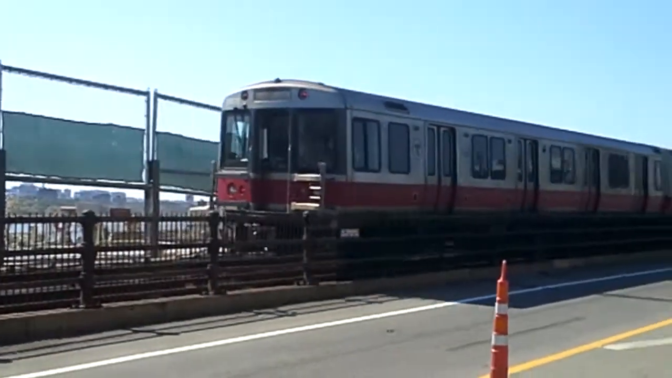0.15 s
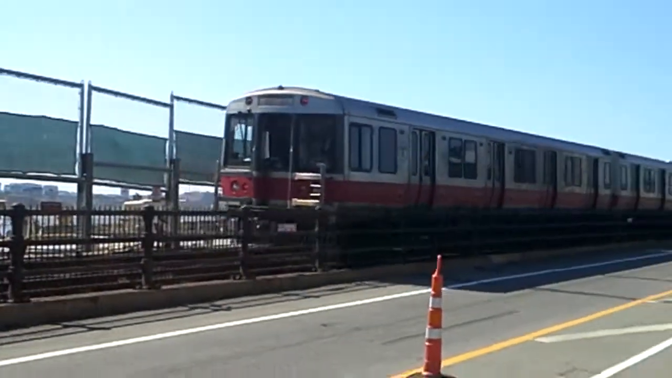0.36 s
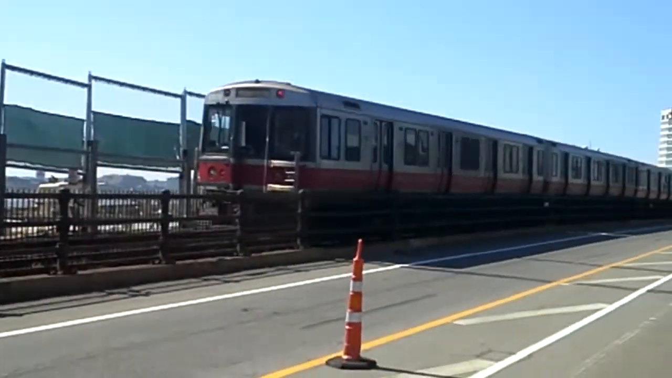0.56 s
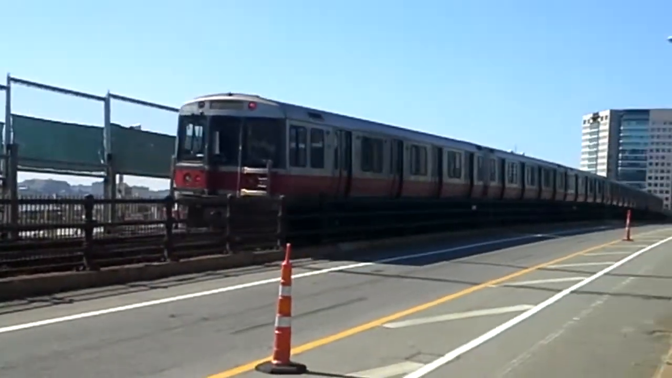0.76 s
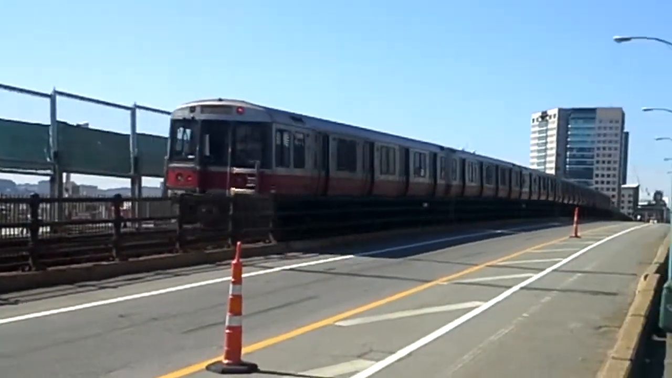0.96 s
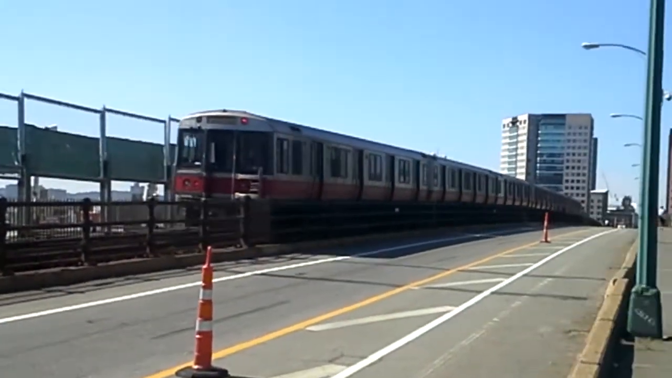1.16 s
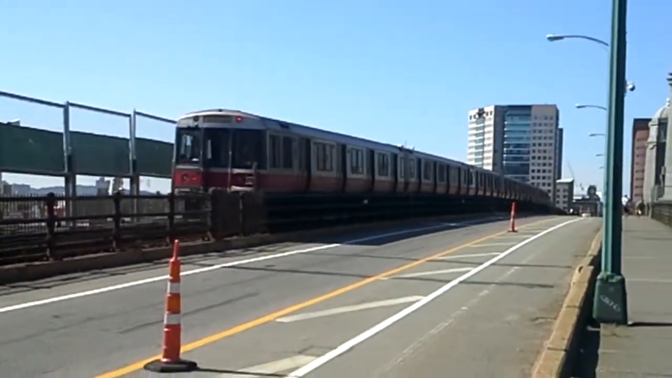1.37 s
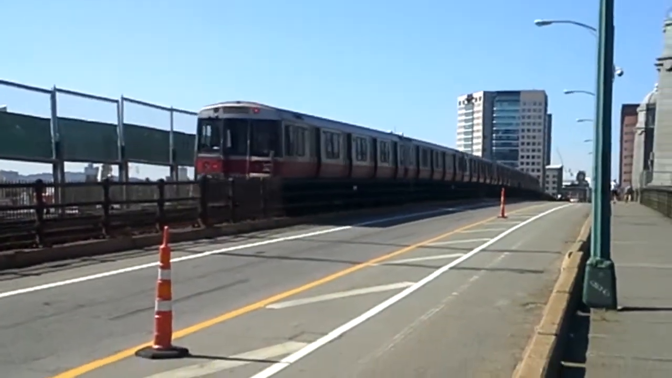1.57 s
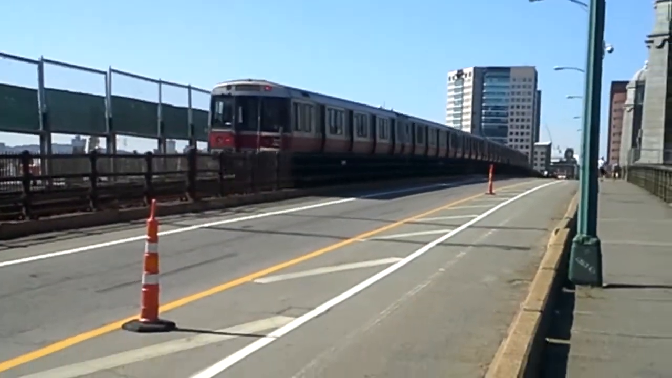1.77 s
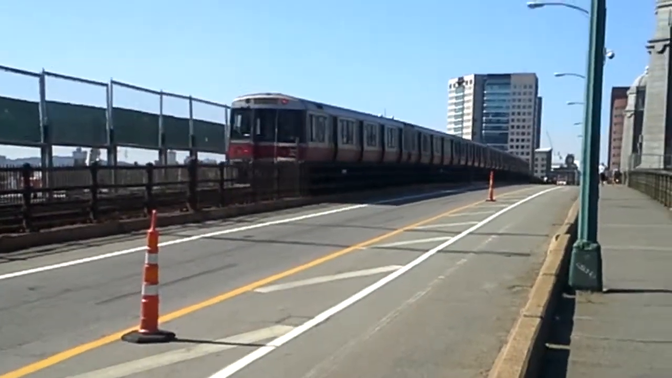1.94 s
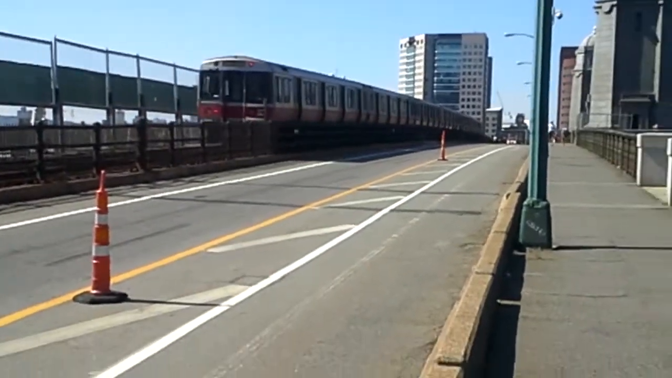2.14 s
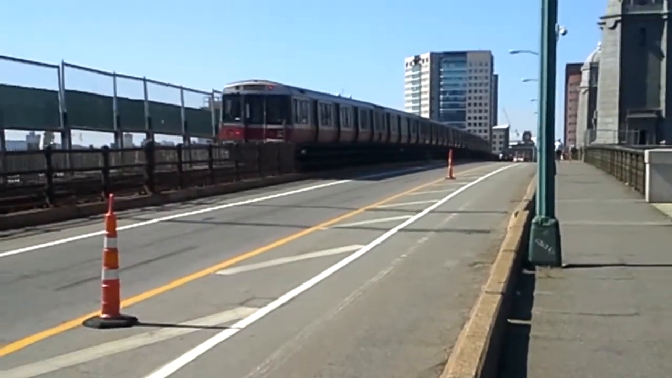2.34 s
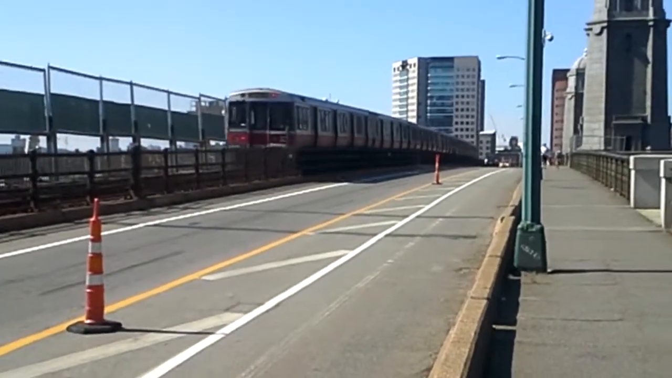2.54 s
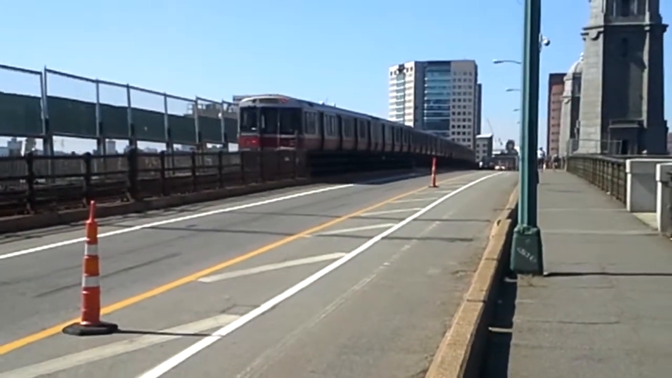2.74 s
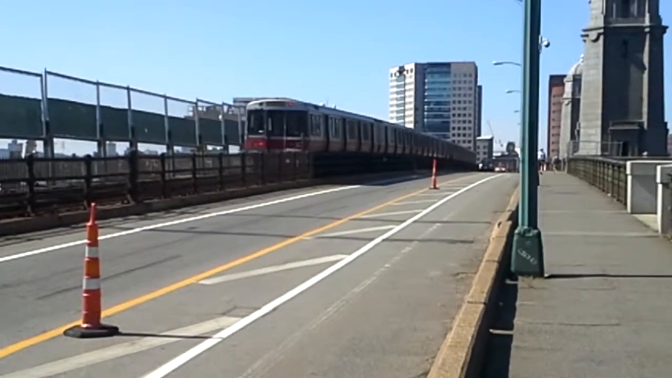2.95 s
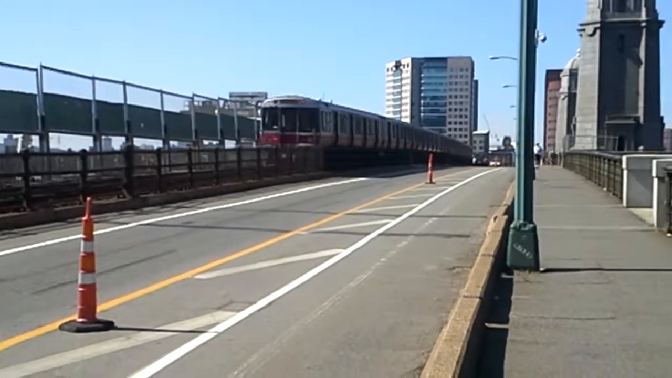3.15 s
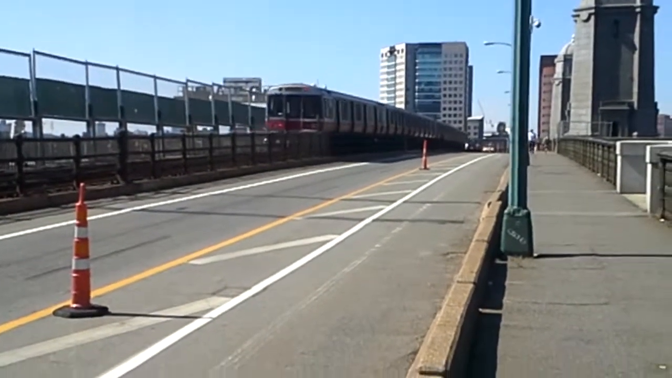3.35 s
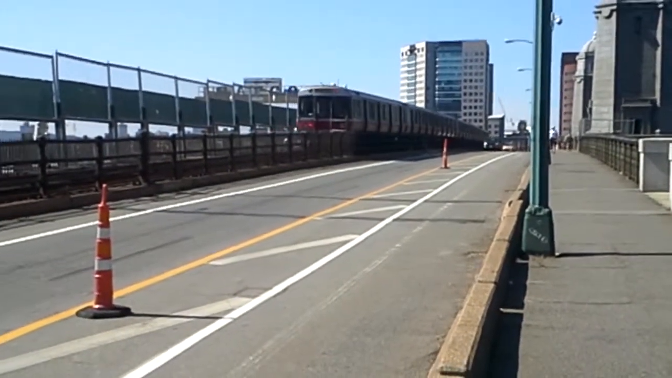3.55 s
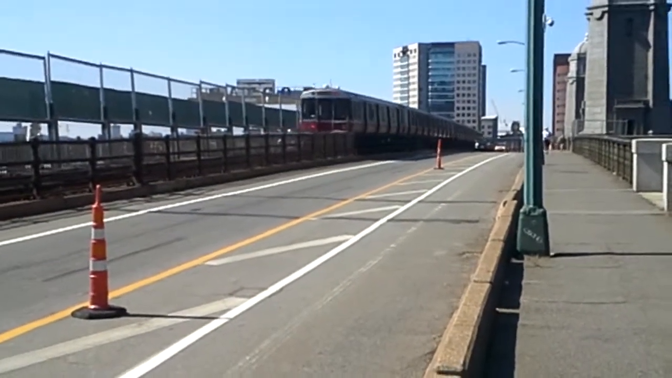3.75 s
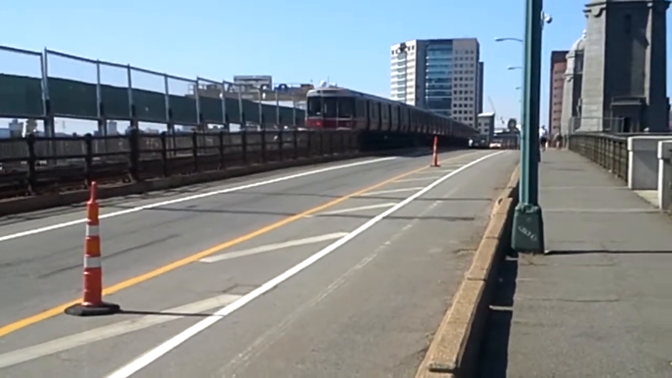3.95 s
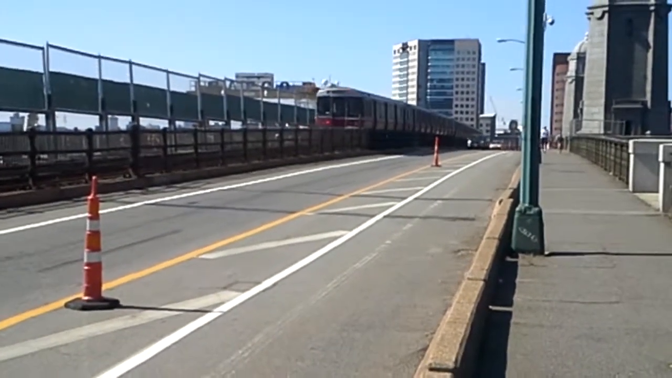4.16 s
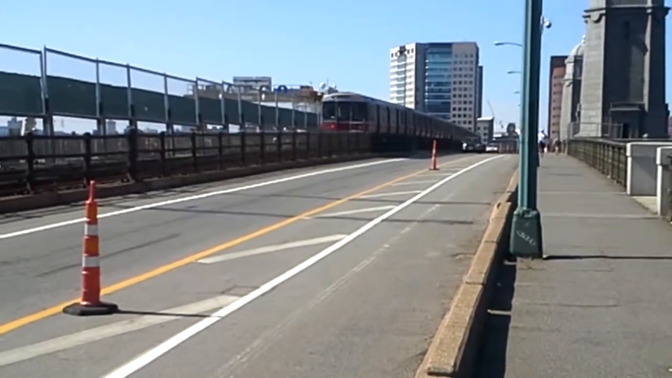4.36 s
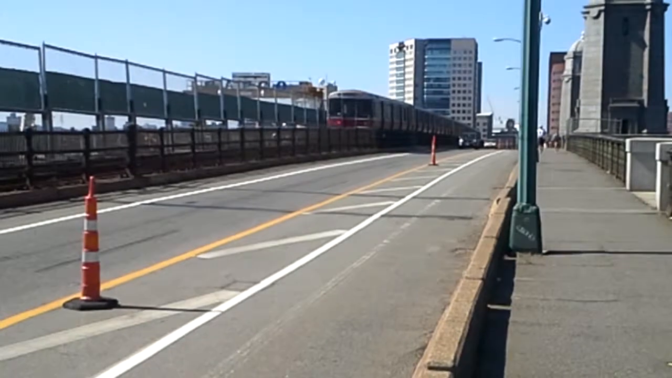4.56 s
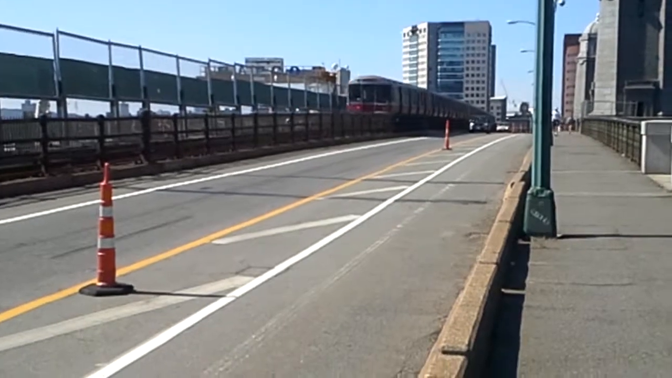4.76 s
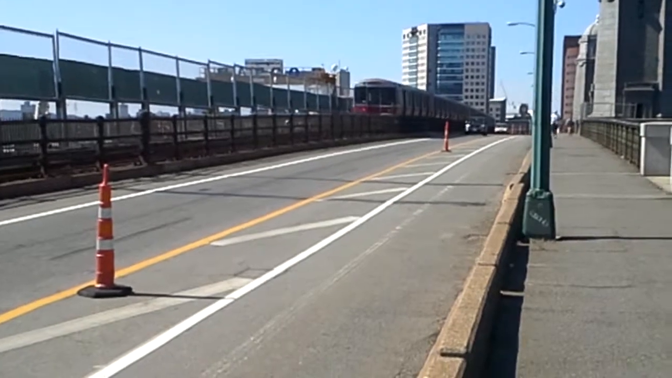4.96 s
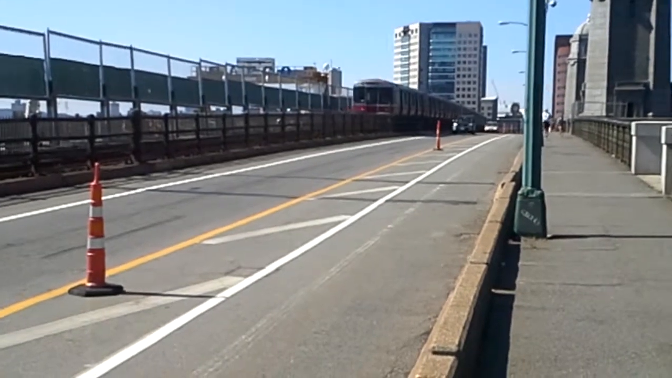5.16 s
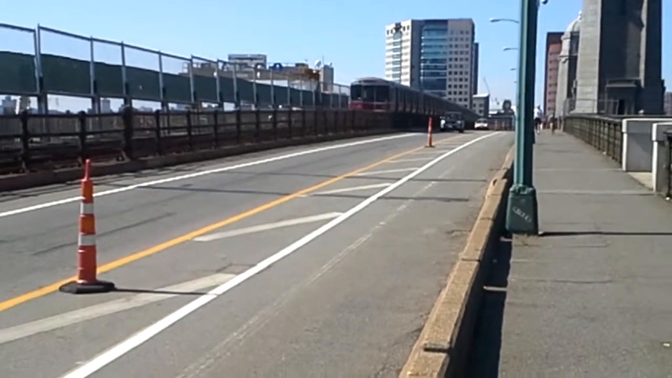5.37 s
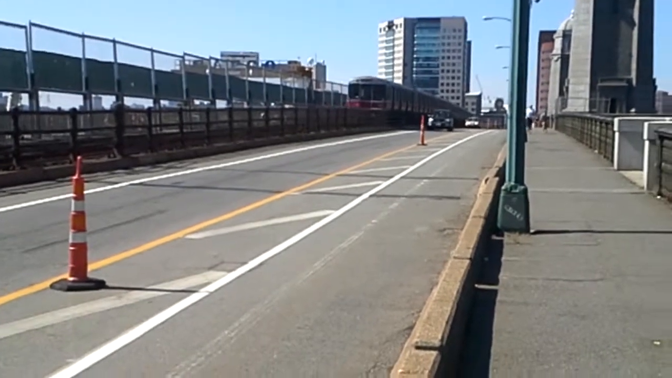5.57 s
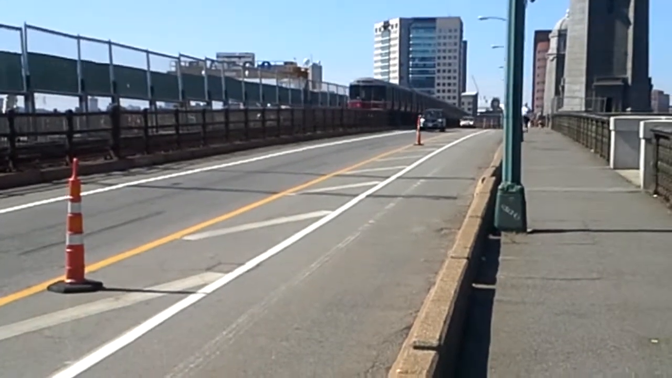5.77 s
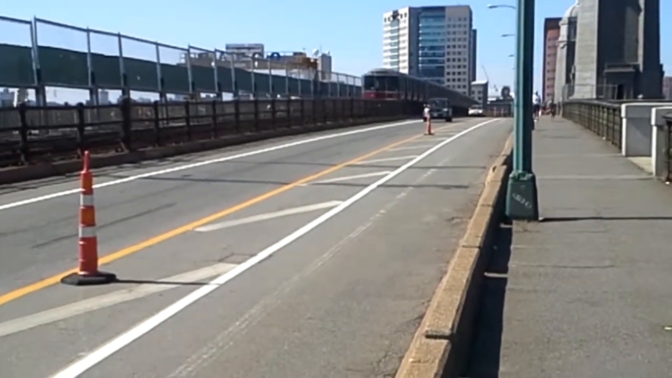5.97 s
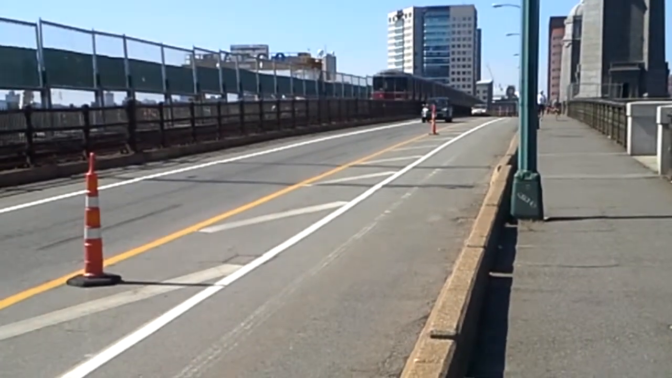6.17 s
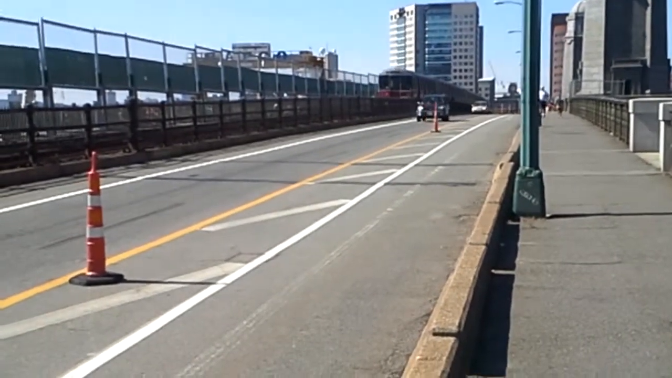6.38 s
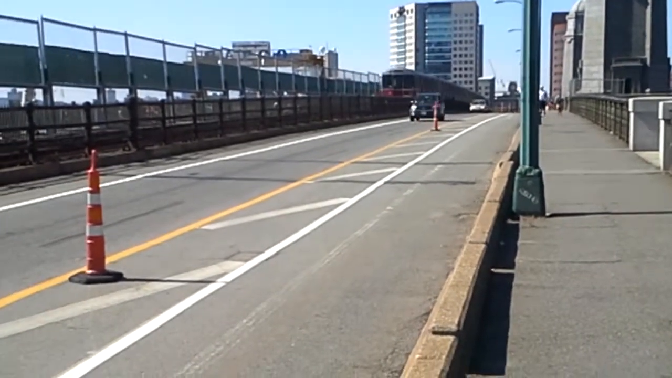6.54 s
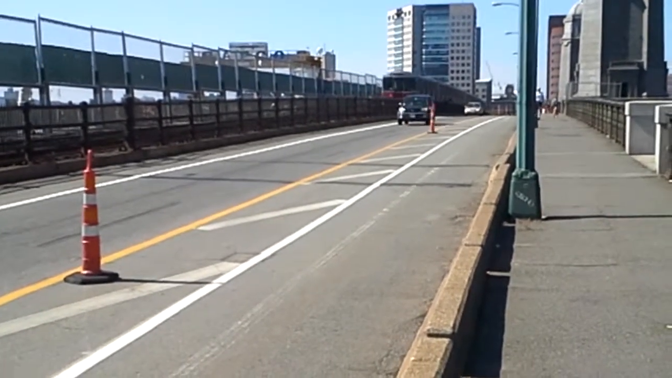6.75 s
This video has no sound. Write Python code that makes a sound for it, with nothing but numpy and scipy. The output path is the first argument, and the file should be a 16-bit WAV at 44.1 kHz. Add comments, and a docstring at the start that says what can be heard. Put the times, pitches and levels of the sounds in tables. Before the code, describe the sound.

A subway train passes close by on a steel bridge, its wheels roaring and banging over rail joints in an uneven clatter that booms through the deck. Faint wheel ringing and a tiny squeak slip in early. As the train draws away, the blows soften, a thin hiss of air swells and dies, and road traffic grows. A small camera microphone hears it, slightly to the left.

```python
"""Subway train on a steel bridge

A train rolls away: its wheels roar and sing on the rails and bang over the rail joints, each blow booming
in the bridge deck and rattling the running gear. A squeak and a few ticks slip in. Air hisses out late,
and road traffic draws near. A small camera's two microphone ports colour the sound,
and the hardest blows overload it."""
import sys
import numpy as np
from scipy import signal
from scipy.fft import rfft, irfft, next_fast_len
from scipy.io import wavfile

SR = 44100
rng = np.random.default_rng(int(sys.argv[2]) if len(sys.argv) > 2 else 0)


def transcribe(signal):
    """Save signal, clipped to [-1, 1], as a 16-bit WAV file at the path in sys.argv[1]."""
    frames = np.atleast_2d(signal).T
    limited = np.clip(frames, -1, 1)
    pcm = np.round(limited * 32767).astype(np.int16)
    wavfile.write(sys.argv[1], SR, pcm)


N = 300321

# Wheels hitting rail joints. Each row: start in seconds, boom level in dB, then knock, clack and rattle
# in dB relative to the boom, burst length in seconds, boom pitch in Hz, knock pitch in Hz.
JOINT_BLOWS = [(0.002, -6, -7, -34, -20.5, 0.097, 216, 564),
               (0.077, 7.5, -12, -21.5, -23.5, 0.049, 275.7, 569.4),
               (0.157, -1, -10.5, -30, -42, 0.084, 370, 476),
               (0.271, 7.5, -9.5, -16.5, -16.5, 0.025, 239.5, 530),
               (0.294, 0, -12, -13, -27, 0.018, 300, 559), (0.315, -13, -6, -14, -23, 0.11, 235, 574),
               (0.392, -11.5, -2.5, -11, -12, 0.016, 254, 574),
               (0.567, 2.5, -12.5, -22, -35, 0.055, 240, 578), (0.634, -4, -9, -25, -38, 0.064, 277, 705),
               (0.685, -9, -7, -26, -28, 0.025, 213, 600), (0.896, -2, -4, -12, -24, 0.032, 307, 687),
               (1.012, -8.5, -3, -17, -37, 0.023, 220, 734),
               (1.084, -3, -6.5, -14.5, -23.5, 0.039, 296, 553),
               (1.205, -3, -4.5, -10.5, -18, 0.046, 273, 515),
               (1.386, 2.5, -8, -14.5, -18, 0.059, 217, 574), (1.5, -8, -4, -12, -19, 0.07, 184, 537),
               (1.695, -3.2, -7.5, -9.5, -22.5, 0.055, 358, 539),
               (1.803, -9.5, -5, -8, -18, 0.035, 177, 600), (1.979, -11, -3.5, -11, -29, 0.09, 290, 563),
               (2.037, -5, -3, -8.5, -17, 0.037, 301, 598), (2.092, -6.5, -8.5, -17, -30, 0.068, 328, 616),
               (2.227, -7.5, -3.5, -8, -20.5, 0.026, 330, 498),
               (2.256, 1.5, -13, -15.5, -25.5, 0.029, 271, 610), (2.322, -0.5, -8, -16, -27, 0.1, 325, 682),
               (2.45, -3, -9, -14, -25, 0.032, 272, 634), (2.515, -2.5, -8, -12.5, -20, 0.045, 246, 553),
               (2.534, 0, -10, -20, -31, 0.03, 293, 745), (2.642, -5.5, -10, -7, -23, 0.02, 310, 591),
               (2.823, -7, -4, -9, -23, 0.04, 253, 555), (3.003, -11, -23, -32, -36, 0.024, 290, 480),
               (3.119, -4.5, -10.5, -15.5, -29, 0.092, 278, 607),
               (3.166, -1.5, -15, -14, -29, 0.055, 252, 564), (3.305, -13, -2.5, -2, -20, 0.02, 214, 597),
               (3.353, -8, -3.5, -4, -20, 0.018, 201, 620), (3.463, -2, -7.5, -13.5, -23, 0.068, 235, 707),
               (3.543, -9, -26, -17, -30, 0.043, 276, 713), (3.655, -2, -4, -8, -22, 0.033, 267.5, 712),
               (3.767, -13, -4, 0.5, -20, 0.021, 340, 704), (3.957, -6.5, -8, -6, -24, 0.029, 244, 547),
               (3.975, -5, -17, -17, -24.5, 0.11, 272, 614), (4.064, -5, -14, -14, -25, 0.051, 285, 666),
               (4.26, -8.5, -9, -20, -29, 0.13, 204, 604), (4.298, -13.5, -8, -6, -18.5, 0.037, 257, 610),
               (4.34, -1, -19, -24, -38, 0.07, 273, 426), (4.472, -1.5, -16, -17, -29, 0.14, 283.3, 474),
               (4.587, -4.5, -5.5, -8, -23, 0.033, 210, 585), (4.719, -7, -6, -10, -22, 0.094, 332, 645),
               (4.778, -1.5, -10, -14, -28, 0.056, 288, 627), (4.826, -4.5, -12, -19, -41, 0.093, 191, 515),
               (4.909, -3, -14, -19, -30, 0.024, 225, 490), (5.085, -7, -17, -14, -29.5, 0.049, 295, 484),
               (5.426, -9, -12.5, -11, -25, 0.031, 243, 780), (5.502, -10.5, -16, -9, -28, 0.03, 258, 804),
               (5.605, -19.5, 0, -5, -20, 0.028, 171, 683), (5.711, -4.5, -12, -13, -24.5, 0.089, 282, 527),
               (5.902, -3.5, -10, -12.5, -22.5, 0.056, 210, 544),
               (6.004, -10.5, -13, -11, -32, 0.028, 259, 577),
               (6.197, -10.5, -21, -19, -35, 0.097, 217, 540),
               (6.375, -9.5, -27, -24, -32, 0.025, 268, 710), (6.579, -9, -22, -9.5, -41, 0.055, 231, 556)]


def amp(db):
    """Turn decibels into a gain."""
    return 10 ** (np.asarray(db) / 20)


def pan(left_db):
    """Left and right gains, with the left louder by left_db."""
    return amp(left_db * np.array([[.5], [-.5]]))


def unit_rms(x):
    """Scale a signal to an average (rms) level of 1."""
    return x / np.sqrt(np.mean(x ** 2) + 1e-20)


def in_time(rows):
    """Turn rows that start with a time into one curve for each further column."""
    times, *columns = np.transpose(rows)
    return [np.interp(np.arange(N) / SR, times, column) for column in columns]


def at_hz(points, hz):
    """Read between a table's points on a logarithmic frequency axis."""
    points_hz, values = np.transpose(points)
    return np.interp(np.log(hz), np.log(points_hz), values)


def drift(rate_hz):
    """A smooth random wobble, about 1 in size."""
    pole = np.exp(-80 * np.pi * rate_hz / SR)
    slow = signal.lfilter([1], [1, -2 * pole, pole * pole], rng.standard_normal(N // 40 + 2002))[2000:]
    return np.interp(np.arange(N) / 40, np.arange(len(slow)), unit_rms(slow))


def ring(push, hz, t60):
    """A resonance: each push rings at hz and fades by 60 dB in t60 seconds."""
    decay, step = amp(-60 / (t60 * SR)), 2 * np.pi * hz / SR
    return signal.lfilter([0, np.sin(step)], [1, -2 * decay * np.cos(step), decay * decay], push + 1e-18)


def ports(mid, side, hz):
    """Spread a sound over the two microphone ports, coloured by the camera's housing."""
    # Each row: frequency in Hz, how alike left and right are from 0 to 1.
    likeness = [(60, 0.35), (150, 0.62), (380, 0.76), (940, 0.95), (2370, 0.24), (4200, 0.23), (5940, 0.3),
                (14900, 0.01)]
    # Each row: frequency in Hz, how much louder the left is in dB.
    left_boost = [(60, 2), (150, 2.5), (380, 3), (940, 4), (2370, 11), (4200, 5), (5940, 4.5), (9000, 10.5),
                  (14900, 0)]
    # Resonances and dips of the housing. Each row: centre in Hz, width in Hz, gain in dB.
    housing = [(1810, 52, 1), (2493, 330, 4), (3610, 200, -4.5), (4100, 180, 0), (5020, 270, 2),
               (6020, 780, -10), (9670, 200, -2)]
    alike = at_hz(likeness, hz)
    stereo = np.sqrt(1 + alike) * mid + np.sqrt(1 - alike) * side * np.array([[1], [-1]])
    colour_db = sum(db * np.exp(-((hz - centre) / width) ** 2) for centre, width, db in housing)
    return stereo * amp(colour_db) * pan(at_hz(left_boost, hz))


def coloured_noise(spectrum):
    """Steady stereo noise with the given spectrum, heard through the ports."""
    # Each row: frequency in Hz, how far the left port leads in radians.
    port_phase = [(0, 0), (1640, 0.71), (4740, -1.2), (6460, 0), (10200, 6), (11000, 14.5), (13700, -3),
                  (15100, -10)]
    size = next_fast_len(N)
    hz = np.maximum(np.arange(size // 2 + 1) * SR / size, 1)
    mid, side = rfft(rng.standard_normal((2, size)))
    lead = np.exp(1j * np.interp(hz, *np.transpose(port_phase)) * np.array([[1], [0]]))
    inside = (hz > spectrum[0][0]) & (hz < spectrum[-1][0])
    shaped = lead * ports(mid, side, hz) * amp(at_hz(spectrum, hz)) * inside
    return unit_rms(irfft(shaped, size)[:, :N])


def split(x, edges_hz):
    """Cut a noise into neighbouring frequency bands."""
    size = next_fast_len(N)
    hz, whole = np.arange(size // 2 + 1) * SR / size, rfft(x, size)
    return [irfft(whole * ((hz >= a) & (hz < b)), size)[:, :N] for a, b in zip(edges_hz, edges_hz[1:])]


def patchy(x, together_db, own_db, rate_hz):
    """Make each octave flicker, partly with the others and partly alone."""
    shared = drift(rate_hz)
    bands = split(x, [0, 90, 180, 360, 700, 1400, 2800, 5600, 22050])
    return sum(band * amp(together_db * shared + own_db * drift(2 * rate_hz)) for band in bands)


def rolling_wheels():
    """Wheels roar and sizzle on the rails, fading as the train leaves, while the bridge rumbles."""
    # The rolling noise. Each row: frequency in Hz, level in dB.
    spectrum = [(15, -67), (35, -34), (62, -8), (192, 0), (285, 3), (422, -6.5), (658, -4), (1080, -14.5),
                (2370, -25), (3610, -28), (4220, -25.5), (5930, -33.5), (8120, -37), (9010, -45.5),
                (10500, -98), (13000, -106)]
    # The train drawing away. Each row: time in seconds, roar in dB, rail sizzle in dB.
    train_levels = [(0.0, -13.5, -28), (0.23, -16.5, -35), (0.42, -15, -30), (1.12, -13.5, -30.5),
                    (1.63, -17, -36.5), (2.03, -17, -34), (2.47, -14.5, -33), (2.92, -17.5, -36.5),
                    (3.17, -22.5, -40.5), (3.32, -15.5, -37.5), (3.57, -19.5, -36), (3.73, -18.5, -37),
                    (4.1, -22.5, -42), (4.74, -20, -35.5), (4.91, -23, -38.5), (5.31, -25, -39.5),
                    (6.35, -25, -41), (6.81, -20, -43)]
    # The sizzle's upper part. Each row: time in seconds, gain in dB against the rest of the sizzle.
    shimmer_levels = [(0, 7.5), (.7, -0.5), (1.0, 2.5), (1.5, 5.5), (1.9, -4.5), (3, -1.5), (4.4, -5.5),
                      (5.2, -1.5), (6.81, 0)]
    # The bridge's deep rumble. Each row: time in seconds, level in dB.
    rumble_levels = [(0, -26), (1.6, -33), (2.4, -28), (3.3, -34), (3.9, -28.5), (4.6, -33), (4.8, -23.5),
                     (5.0, -30), (6.2, -48), (6.6, -24.5), (6.81, -41)]
    roar_db, sizzle_db = in_time(train_levels)
    noise = patchy(coloured_noise(spectrum), together_db=0.96, own_db=1.5, rate_hz=11.7)
    deep, rumble, roar, sizzle, shimmer = split(noise, [0, 65, 150, 3400, 6300, 22050])
    rails = amp(sizzle_db) * unit_rms(sizzle + shimmer * amp(in_time(shimmer_levels)[0]))
    bridge = amp(in_time(rumble_levels)[0]) * unit_rms(rumble)
    return amp(roar_db) * (roar + deep) + rails + bridge


def road_traffic():
    """A wash of distant traffic and the tyres of an oncoming car; both dip, then grow."""
    # Each row: time in seconds, distant wash in dB, tyres in dB.
    road_levels = [(0, -24.5, -30), (2, -33, -39), (4.5, -25, -43), (5.3, -25.5, -41), (6.0, -23, -29),
                   (6.81, -22, -30)]
    # The tone of the wash and of the tyres. Each row: frequency in Hz, level in dB.
    wash_spectrum = [(15, -78), (25, -62.5), (50, -16), (178, -1.5), (217, 1), (357, -5.5), (493, -40),
                     (545, -26), (832, -19.5), (942, -13), (1710, -18), (4740, -25), (6070, -41.5),
                     (7600, -43), (9500, -60.5), (12400, -74), (20900, -120)]
    tyre_spectrum = [(1000, -25), (1400, -4), (1700, 5.5), (2000, -6.5), (2700, -12), (3400, -15)]
    wash_db, tyres_db = in_time(road_levels)
    wash = patchy(coloured_noise(wash_spectrum), together_db=0.54, own_db=0.05, rate_hz=0.43)
    return amp(wash_db) * wash + amp(tyres_db) * coloured_noise(tyre_spectrum)


def joint_clatter():
    """Each blow shakes loose steel: boom, knock, clack and rattle hold briefly, then leave a tail."""
    # The noise of a blow. Each row: frequency in Hz, level in dB.
    spectrum = [(53, -47), (90, -16), (181, -12), (272, -6), (417, -8), (746, -8.5), (1020, -19),
                (1260, -17.5), (1420, -21.5), (2960, -32), (3650, -27.5), (4250, -27.5), (4900, -17),
                (5840, -25.5), (7370, -27), (9300, -40.5), (10300, -54.5), (12100, -75), (20500, -120)]
    # Wheel resonances kept ringing by the rattle. Each row: pitch in Hz, width in Hz, level in dB.
    wheel_tones = [(4127, 90, -3.5), (4360, 120, 0.5), (4565, 160, -1)]
    boom, knock, clack, rattle = split(coloured_noise(spectrum), [0, 450, 950, 3300, 22050])
    wheels = sum(amp(db) * unit_rms(ring(rattle, hz, 1.3 / width)) / 2 for hz, width, db in wheel_tones)
    bands = [boom, knock, clack, unit_rms(rattle) + wheels]
    burst_db, tail_db = [-16.5, -7, -6.5, -9.5], [-8.0, -3.0, -6.5, 6.5]   # one value for each band
    rises_s, tail_t60 = [.013, 0.013, 0.0099, 0.0098], [.22, 0.47, 0.39, 0.42]
    chatter_db, chatter_hz = 2.5, 24
    out, chatter = np.zeros((2, N)), drift(chatter_hz)
    for k, (band, rise) in enumerate(zip(bands, rises_s)):
        power = np.zeros((2, N))
        for start, boom_db, *relative_db, hold, _, _ in JOINT_BLOWS:
            i = max(round((start - 0.85 * rise) * SR), 0)
            t = np.arange(min(SR // 4, N - i)) / SR
            # Echoes along the girders keep the burst up before it drops.
            held = np.exp(-2 * (t / (np.clip(hold, .012, .08) + rise)) ** 3)
            tail = amp(2 * (tail_db[k] - 60 * t / tail_t60[k]))
            shape = (1 - np.exp(-t / rise)) ** 2 * (held + tail)
            sides = pan(11.5 * np.exp(-start / 0.61))   # the first blows come from the left
            level = amp(boom_db + [0, *relative_db][k] + burst_db[k]) * sides
            power[:, i:i + len(t)] += level ** 2 * shape
        # Loose parts make the clack and rattle lumpy.
        lumps = amp(chatter_db * (0.35 * chatter + 0.71 * drift(chatter_hz))) if k > 1 else 1
        out += unit_rms(band) * np.sqrt(power) * lumps
    return out


def deck_clunk(t, hz, db):
    """A heavy note of the struck deck: it swells, dies away and climbs a little in pitch."""
    peak_s, climb_per_s = 0.01, 2.7
    swell = t / peak_s * np.exp(1 - t / peak_s)
    note = np.sin(2 * np.pi * hz * t * (1 + climb_per_s * (t / 2 - peak_s)))
    return ports(amp(db) * swell ** 2 * note, 0, hz)


def joint_ringing():
    """The same blows ring the natural tones (modes) of deck and wheels, and add two clunks each."""
    # Deck and wheel modes. Each row: pitch in Hz, level in dB, seconds to fade by 60 dB.
    modes = [(156, -17.5, 0.063), (196.7, 4, 0.12), (252.4, -3, 0.14), (301.5, -7, 0.11),
             (362.6, -3.5, 0.25), (488, -9, 0.15), (567.4, -6.5, 0.36), (634, -9.5, 0.11),
             (717, -10.5, 0.13), (783, 1, 0.035), (907, -11.5, 0.15), (1198, -29, 0.33), (1693, -14, 0.42),
             (2410, -30, 0.41), (4220, -21, 0.066), (4135, -13.5, 0.24), (4410, -24.5, 0.24),
             (4830, -16, 0.19)]
    favour_db, favour_width, detune_range = 4.5, 0.0726, 0.0802   # width and range: shares of the pitch
    hz, mode_db, t60 = np.transpose(modes)
    out, t = np.zeros((2, N + SR)), np.arange(SR // 6) / SR
    fall = -np.log(1000) * t / t60[:, None]
    # Each mode builds up over a few milliseconds as sound arrives from along the deck.
    swell = (np.exp(fall) - np.exp(fall / 0.23)) * np.cos(np.pi / 2 * t / t[-1])
    for start, boom_db, knock_db, clack_db, rattle_db, _, boom_hz, knock_hz in JOINT_BLOWS:
        spread, detune, phase = rng.random((3, len(hz))) - .5
        # Where the wheel lands lifts the modes near two pitches and pulls them towards those pitches.
        aim_hz = np.where(hz < 450, boom_hz, knock_hz)
        near = np.exp(-(np.log(hz / aim_hz) / favour_width) ** 2)
        pitch = hz * (1 + detune_range * detune) * (1 - near) + aim_hz * near
        phase = phase * (1 - near)   # favoured modes start in step
        tones = swell * np.sin(2 * np.pi * (pitch[:, None] * t + phase[:, None]))
        band_db = np.select([hz < 450, hz < 950, hz < 3300],
                            [0, knock_db + 10, clack_db + 10.5], rattle_db + 24)
        level_db = boom_db + band_db + mode_db - 15.5 + favour_db * near + 2.3 * spread
        clunks = deck_clunk(t, boom_hz, boom_db - 10) + deck_clunk(t, knock_hz, boom_db + knock_db - 9.5)
        i = round(start * SR)
        out[:, i:i + len(t)] += ports(amp(level_db), 0, hz) @ tones + clunks
    return out[:, :N]


def singing_wheels():
    """Rolling on the rail keeps two narrow wheel resonances alive; they waver and fade."""
    # The low and the high tone in Hz.
    pitches = [1280, 1980]
    # Each row: time in seconds, low tone in dB, high tone in dB.
    tone_levels = [(0, -51, -39), (.3, -48, -46), (.9, -36.5, -35), (1.1, -48, -53), (1.4, -36, -44),
                   (1.75, -45, -59), (2.1, -46.5, -63), (3.1, -45, -63), (3.4, -61, -63)]
    out, waver_db = np.zeros((2, N)), 2
    for db, hz in zip(in_time(tone_levels), pitches):
        level = amp(db + waver_db * drift(2.0))
        tone = unit_rms(ring(rng.standard_normal(N), hz, t60=0.52))
        out += ports(level * tone, 0, hz)
    return out


def treble_flicker():
    """Faint narrow bands of high treble come and go."""
    # The flicker's tone. Each row: frequency in Hz, level in dB.
    spectrum = [(9400, -5), (10300, -5), (11200, 0.5), (12400, -18)]
    # Each row: time in seconds, level in dB.
    levels = [(0, -49), (.5, -63), (.9, -88), (1.1, -55), (1.5, -65), (1.8, -68), (2.1, -55), (2.6, -69.5),
              (3.2, -84)]
    swing_db = 6
    bands = split(coloured_noise(spectrum), np.arange(9400, 12500, 600))
    return amp(in_time(levels)[0]) * sum(band * amp(swing_db * drift(19.0)) for band in bands)


def squeak():
    """One very short, rough, rising squeak."""
    # In order: middle in seconds, level in dB, pitch in Hz, climb in Hz a second, half length in seconds.
    settings = (.9545, -18.5, 4020, 9000, .004)
    middle, db, hz, climb, half_length = settings
    t = np.arange(N) / SR - middle
    swell = np.exp(-(t / half_length) ** 2 / 2)
    tone = np.sin(2 * np.pi * (hz + climb * t / 2) * t)
    return ports(amp(db + 2 * drift(150.0)) * swell * tone, 0, hz)


def ticks():
    """Tiny, bright, gritty snaps of fast-fading noise."""
    # Each row: start in seconds, level in dB, how much louder the left is in dB.
    snaps = [(1.206, -41, 4), (1.7713, -46, 4), (1.9455, -45, 11), (6.7022, -54, 7)]
    clicks, t = np.zeros((2, N)), np.arange(SR // 20) / SR
    grit = rng.standard_normal((len(snaps), len(t))) * amp(-60 * t / 0.06)
    for (start, db, left_db), snap in zip(snaps, grit):
        i = round(start * SR)
        clicks[:, i:i + len(t)] = amp(db + 9.5) * pan(left_db) * snap
    return signal.sosfilt(signal.butter(2, 8000, "high", fs=SR, output="sos"), clicks + 1e-18)


def air_hiss():
    """Escaping air swells, sags and dies; its top band slides up and back."""
    # The air's tone. Each row: frequency in Hz, level in dB.
    spectrum = [(5000, -23), (6500, -5.5), (7500, 1.5), (9000, -2.5), (10000, -13.5), (12000, -11),
                (13300, -13), (14600, -6)]
    start_s, attack_s, hold_s, release_s = 4.135, 0.71, 1.14, 0.46
    level_db, sag_db_per_s, flicker_db = -43.5, 0.5, 3
    t = np.arange(N) / SR - start_s
    fade_out = np.clip((attack_s + hold_s + release_s - t) / release_s, 0, 1)
    swell = (np.clip(t / attack_s, 0, 1) * fade_out) ** 2
    since_peak = np.maximum(t - attack_s, 0)
    top_hz = 11360 + 1300 * np.exp(-((t + start_s - 5.65) / 0.96) ** 2)   # highest at 5.65 seconds
    lift_db = 16.5 - 16 * np.minimum(since_peak, 2)   # the top band stands out, then sinks back
    noise = coloured_noise(spectrum) * amp(0.4 * drift(4.1))
    edges_hz = np.arange(10000, 15001, 500)
    body, *high_bands = split(noise, [0, *edges_hz])
    top = np.zeros((2, N))
    for band, hz in zip(high_bands, edges_hz):
        lag_s = 0.2 * max(hz / 1000 - 12, 0)   # above 12 kHz the hiss sets in later
        fade_in = np.clip(4 * (t - lag_s), 0, 1)
        near_top = np.exp(-((hz + 250 - top_hz) / 1200) ** 2)
        top += band * fade_in * amp(flicker_db * drift(14.0) + lift_db * near_top)
    return amp(level_db - sag_db_per_s * since_peak) * swell * (body + swell * top) * pan(left_db=2.5)


def scene():
    """Add up all the sounds at the microphone ports."""
    return (rolling_wheels() + road_traffic() + joint_clatter() + joint_ringing()
            + singing_wheels() + treble_flicker() + ticks() + squeak() + air_hiss())


def record(dry):
    """The camera's converter overloads on the loudest peaks, and the highest treble is cut."""
    sharpness, cutoff_hz = 16, 15400
    clipped = dry / (1 + np.abs(dry) ** sharpness) ** (1 / sharpness)
    lowpass = signal.cheby2(12, 70, cutoff_hz, fs=SR, output="sos")
    return np.clip(signal.sosfilt(lowpass, clipped), -1, 1)


dry = scene()
out = record(dry)
transcribe(out)
```